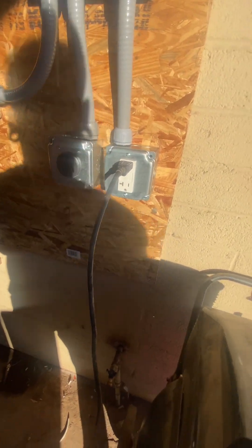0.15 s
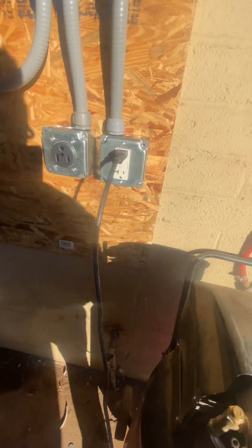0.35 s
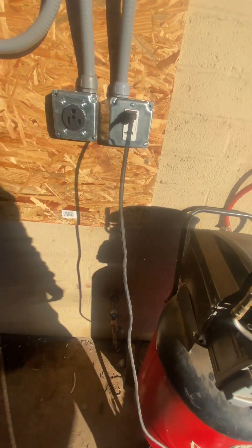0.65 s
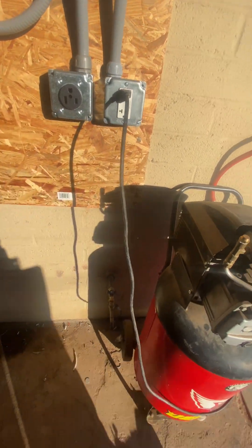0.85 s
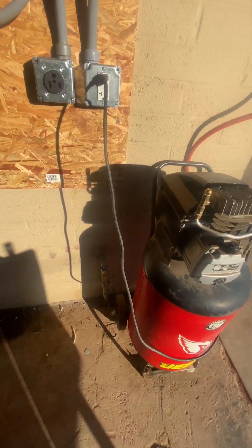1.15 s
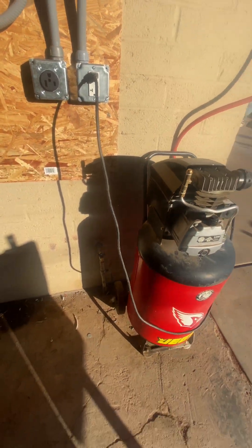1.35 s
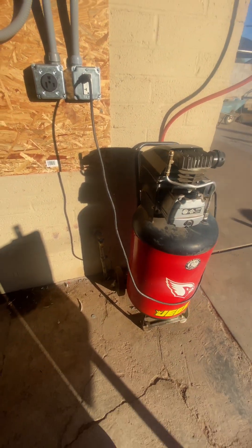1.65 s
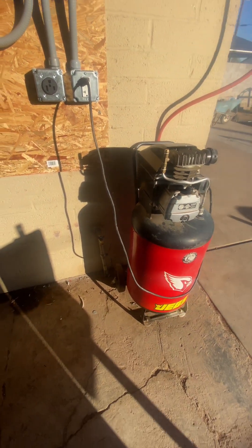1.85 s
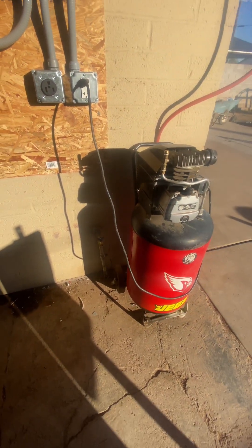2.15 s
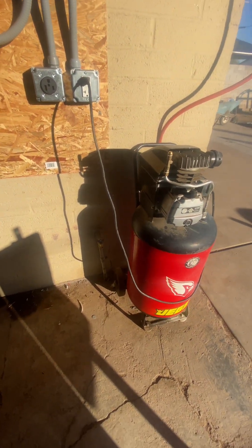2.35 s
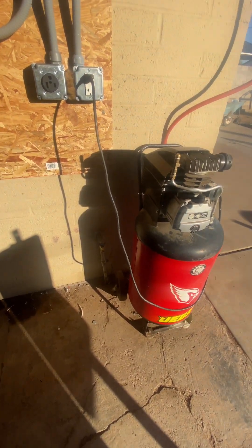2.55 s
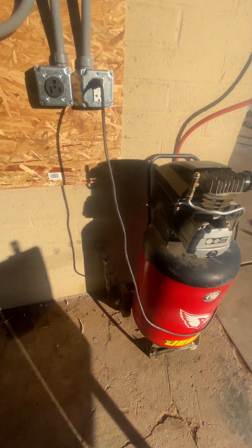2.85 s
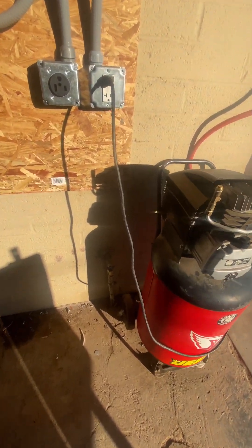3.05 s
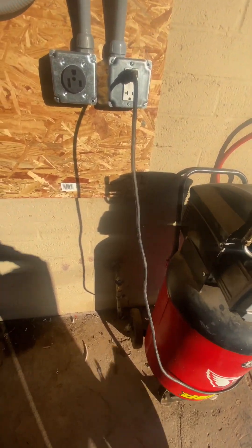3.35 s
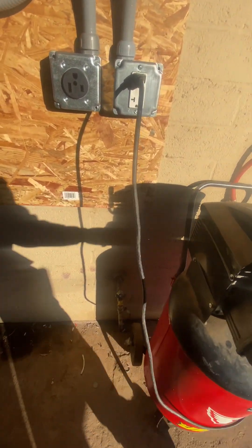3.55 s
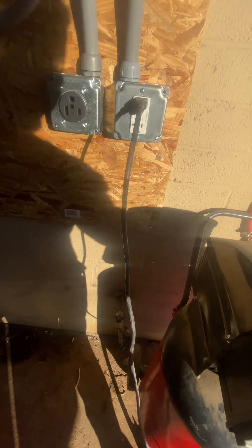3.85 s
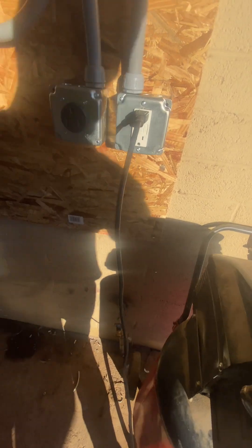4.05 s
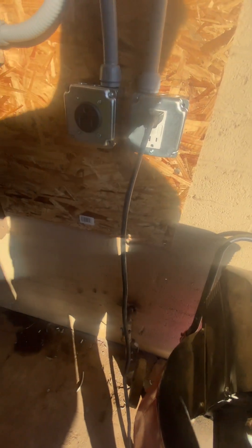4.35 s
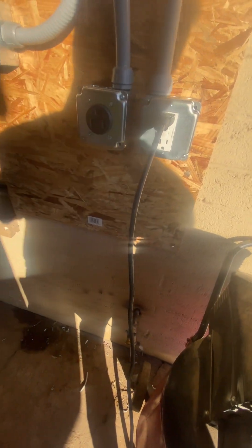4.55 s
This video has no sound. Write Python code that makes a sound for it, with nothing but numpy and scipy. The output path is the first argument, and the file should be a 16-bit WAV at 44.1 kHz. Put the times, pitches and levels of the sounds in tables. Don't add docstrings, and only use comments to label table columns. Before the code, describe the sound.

A small direct-drive air compressor is already running at full speed, close by, on concrete beside a wall. Its opening instant is slightly louder, then settles at once. The motor and pump make a rough, even low buzz, nearly sixty pulses per second, with low rushing intake air. Over it lies loud, bright metallic valve clatter, ringing and slightly unsteady, with tiny falling squeaks blended into the buzz. From about 0.2 to 2 seconds the microphone backs away; the clatter is strongest around 0.5, then drops by 1.2 and the hum thins. Faint dull footsteps fall around 0.7 to 0.8, 1.2, 1.6 to 1.9 and 2.2 to 2.6 seconds, mostly masked. From 2.5 the listener returns, passing the tank near 3.25 as the rattle brightens and strengthens, reaching the wall about 4.1. A last faint shuffle comes near 4.6; the machine still runs at the end, around 4.7.

```python
import sys
import numpy as np
from scipy import signal
from scipy.fft import rfft, irfft
from scipy.io import wavfile
from scipy.ndimage import uniform_filter1d, map_coordinates

SR = 44100
rng = np.random.default_rng(int(sys.argv[2]) if len(sys.argv) > 2 else 0)


def gain_from_db(level_db):
    decades = np.asarray(level_db, float) / 20
    return 10 ** decades


def generate_wav(signal):
    frames = np.transpose(np.atleast_2d(signal))
    scaled = np.clip(frames, -1, 1) * 32767
    pcm = np.round(scaled).astype(np.int16)
    wavfile.write(sys.argv[1], SR, pcm)


N = 207578

SHAFT_HZ = 56.87
STEPS = 1024
TURN_SR = SHAFT_HZ * STEPS
TURNS = int(N / SR * SHAFT_HZ) + 3
TOP_ORDER = 30
SOUND_M_S = 343
# time_s, place (0 by the wall, 1 stepped back, 2 passing the tank, 3 by the wall again)
WALK = [
    (0, 0),
    (.2, .1),
    (.8, .58),
    (1.4, .9),
    (2, 1),
    (2.5, 1.1),
    (3.25, 2),
    (4.1, 3),
    (4.71, 3),
]


def evened(x):
    return x / np.sqrt(np.mean(np.abs(x) ** 2) + 1e-20)


def levelled(x, turns):
    return x / np.sqrt(uniform_filter1d(x ** 2, int(turns * STEPS)) + 1e-20)


def curve(rows, t, axis=1):
    rows = np.asarray(rows)
    return np.interp(t, rows[:, 0], rows[:, axis])


def on_log(points, log_hz):
    hz, value = np.transpose(points)
    return np.interp(log_hz, np.log(hz + 1), value, left=value[0], right=value[-1])


def above(hz, steep):
    return lambda log_hz: 1 / (1 + np.exp(-steep * (log_hz - np.log(hz))))


def coloured(x, gain, rate):
    log_hz = np.log(np.fft.rfftfreq(len(x), 1 / rate) + 1)
    return irfft(rfft(x) * gain(log_hz), len(x))


def places(t):
    place = np.clip(curve(WALK, t), 0, 3)
    return np.clip(1 - np.abs(place - np.arange(4)[:, None]), 0, 1)


def drifting(width, memory_turns):
    window = np.exp(-.5 * (np.arange(-150, 151) / memory_turns) ** 2)
    noise = rng.standard_normal((TURNS + 300, width))
    return evened(signal.fftconvolve(noise, window[:, None], "valid", axes=0))


def feet(decay_s=0.0089):
    # start_s, level_db, pitch_hz
    footfalls = [
        (.70, -44, 130),
        (.78, -36, 140),
        (1.19, -46, 110),
        (1.61, -47, 80),
        (1.85, -43, 80),
        (2.22, -47, 120),
        (2.33, -39, 160),
        (2.57, -55, 90),
        (4.56, -48, 100),
    ]
    out, t = np.zeros(N), np.arange(3000) / SR
    envelope = t / decay_s * np.exp(1 - t / decay_s)
    for start_s, level_db, pitch_hz in footfalls:
        thud = gain_from_db(level_db) * envelope * np.sin(2 * np.pi * pitch_hz * t)
        out[round(start_s * SR):][:len(t)] += thud
    return out


def rush(t, near_db=-38.0, far_db=-41.5):
    # pitch_hz, density_db_per_hz
    air_colour = [(25, -30), (50, -2), (150, -5.5), (300, 0), (600, 1.5), (900, 0), (1500, -1), (2400, -15)]
    noise = evened(coloured(rng.standard_normal(N), lambda f: gain_from_db(on_log(air_colour, f)), SR))
    return gain_from_db(near_db + (far_db - near_db) * places(t)[1]) * noise


def upper_orders(first):
    first_db = np.array([-45.5, -54.5, -45.5, -46.5])
    fall_db_per_order = np.array([.3, -0.4, 0.73, 1.0])
    detour_m = np.array([3.105, 1.03, 1.1, 1.13])
    echo_share = np.array([0.5, 0.59, 1.0, .75])
    order = np.arange(first, TOP_ORDER + 1)[:, None]
    echo = np.clip(echo_share, 0, 1) * np.exp(-2j * np.pi * order * SHAFT_HZ * detour_m / SOUND_M_S)
    return gain_from_db(first_db - fall_db_per_order * (order - first)) * (1 + echo)


def throb(turn, t, scatter_turns=0.22, over_turns=0.37, wobble_db=0.38):
    # shaft_order, level_db at each of the four places
    intake_orders = [(1, -37.5, -48.5, -41.5, -41), (2, -38, -58, -46, -39), (3, -34, -40, -40, -37),
                     (4, -36.5, -36.5, -34.5, -37.5), (5, -44, -45, -42, -42), (6, -26.5, -37.5, -35, -28),
                     (7, -54, -45.5, -70, -45.5), (8, -39.5, -30.5, -37, -36.5),
                     (9, -36, -39.5, -35.5, -32.5), (10, -28, -41, -37.5, -36),
                     (11, -39, -51.5, -46, -36.5), (12, -28, -42.5, -35, -32), (13, -34, -40, -35, -32.5),
                     (14, -37.5, -41.5, -35, -34), (15, -28.5, -40.5, -36.5, -41),
                     (16, -36, -49, -34.5, -34), (17, -44, -55, -46, -35.5), (18, -48, -43.5, -36, -48),
                     (19, -45, -49.5, -48, -47), (20, -41, -48.5, -47, -39), (21, -43, -58, -44, -36.5),
                     (22, -38.5, -60, -41, -49), (23, -50, -50.5, -36.5, -39)]
    over_leaving = [7, 12, 13, 17, 20, 23]
    over_nearing = [7, 11, 12, 17, 19, 21]
    over_passing = [8, 10, 15]
    spread = np.array([.55, 1.5, 1.0, .7])
    rock_turn = .37
    table, coarse_s = np.array(intake_orders), t[::256]
    order, weight = np.arange(1, TOP_ORDER + 1), places(coarse_s)

    legs = ([], over_leaving, over_nearing, over_passing)
    turned = over_turns * np.cumsum([np.isin(order, leg) for leg in legs], axis=0).T
    levels = np.vstack([gain_from_db(table[:, 1:]), upper_orders(len(table) + 1)])
    strength = np.abs((levels * np.exp(2j * np.pi * turned)) @ weight)
    drift = drifting(len(order), 5.2).T
    wobble = np.array([np.interp(coarse_s * SHAFT_HZ, np.arange(len(w)), w) for w in drift])

    luck = spread * rng.standard_normal((len(order), len(weight))) @ weight
    growth = np.sqrt(np.maximum(order[:, None] - 4, 0) / 10)
    rocking = (order <= 2) * (.5 - rock_turn * order)
    phase_turns = -.1 + rocking[:, None] + scatter_turns * growth * luck
    heard = strength * gain_from_db(wobble_db * wobble) * np.exp(2j * np.pi * phase_turns)
    spin = np.exp(2j * np.pi * (turn - .965))
    out = np.zeros(len(t))
    for k, envelope in zip(order, heard):
        out += np.sqrt(2) * (np.interp(t, coarse_s, envelope) * spin ** int(k)).real
    return out


def squeak(uneven_db=1.5, slip_turns=.002):
    start_turn, length_s = .23, .0048
    from_hz, to_hz, fall_s = 11500, 3000, .0019
    slip = slip_turns * rng.standard_normal((TURNS, 1))
    age_s = ((np.arange(STEPS) / STEPS - start_turn) % 1 + slip) / SHAFT_HZ
    cycles = to_hz * age_s - (from_hz - to_hz) * fall_s * np.exp(-age_s / fall_s)
    envelope = np.sin(np.pi * np.clip(age_s / length_s, 0, 1))
    strength = gain_from_db(uneven_db * rng.standard_normal((TURNS, 1)))
    return evened(strength * envelope * np.sin(2 * np.pi * cycles)).ravel()


def valve_drive(memory_turns=15.5, floor_db=-7.5, click_db=19.0, uneven_db=2.0):
    blows = [
        (.1, -2, 0, 0.071),
        (.33, -10, 0, 0.094),
        (0.481, -4, -1, 0.14),
        (.62, 1, .5, 0.33),
        (0.778, -25, 2, 0.082),
    ]
    # pitch_hz, repeating_share of the clatter
    repeat_share = [(1200, .95), (2500, .88), (5000, .8), (8000, .62), (10500, .65), (13000, .45)]
    still_drift = .3
    angle = np.arange(STEPS) / STEPS
    power, clicks = gain_from_db(floor_db) ** 2, np.zeros((TURNS, STEPS))
    for at, hit_db, chatter_db, decay_turns in blows:
        power = power + gain_from_db(chatter_db) ** 2 * np.exp(-((angle - at) % 1) / decay_turns)
        hits_db = hit_db + click_db + uneven_db * rng.standard_normal(TURNS)
        clicks[:, int(at % 1 * STEPS)] = gain_from_db(hits_db)

    count = np.arange(TURNS)
    progress = np.clip(curve(WALK, count / SHAFT_HZ) / 3, 0, 1)
    walked = still_drift * count + (1 - still_drift) * (TURNS - 1) * progress
    repeated = np.sqrt(power) * drifting(STEPS, memory_turns)[walked.astype(int)] + clicks
    fresh = np.sqrt(power) * rng.standard_normal((TURNS, STEPS))

    def share(log_hz):
        return np.clip(on_log(repeat_share, log_hz), 0, 1)

    steady = coloured(evened(repeated).ravel(), lambda f: np.sqrt(share(f)), TURN_SR)
    return steady + coloured(evened(fresh).ravel(), lambda f: np.sqrt(1 - share(f)), TURN_SR)


def ring(x, hz, width_hz):
    r = np.exp(-np.pi * width_hz / TURN_SR)
    pole = [1, -r * np.exp(2j * np.pi * hz / TURN_SR)]
    return signal.lfilter([1], pole, signal.lfilter([1], pole, x)).real


def glint_db(hz, t):
    # centre_s, half_length_s, mode_hz, gain_db
    glints = [
        (.55, .25, 3640, 4),
        (.65, .28, 4605, 4),
        (.45, .08, 5800, -6),
        (.8, .15, 5800, 2),
        (1.22, .15, 5800, -12),
        (4.6, .15, 3640, -4),
        (4.2, .3, 10300, 3),
    ]
    total_db = 0
    for centre_s, half_s, mode_hz, gain_db in glints:
        if abs(mode_hz / hz - 1) < .03:
            total_db = total_db + gain_db * np.exp(-.5 * ((t - centre_s) / half_s) ** 2)
    return total_db


def clatter(turn, broad_db=-2.5, strike_db=29.5, uneven_db=2.0, sway_db=1.5):
    # time_s, level_db
    clatter_level = [(0.0, -19), (0.06, -19), (0.52, -18), (1.19, -22), (2.91, -22.5), (3.25, -20.5),
                     (4.67, -20), (4.71, -21.5)]
    # pitch_hz, density_db_per_hz
    near_colour = [(880, -35), (1500, -16), (1640, -13), (1810, -16), (3180, -12.5), (3680, -2.5),
                   (4140, -7), (4480, -3.5), (8870, -2.5), (10500, -1), (13900, -16), (15500, -48)]
    far_colour = [(880, -33), (1500, -24), (1900, -10.5), (2070, -17.5), (2750, -14.5), (3680, -6.5),
                  (4940, -8), (5770, -2.5), (6550, -5), (10600, -1), (14000, -27.5), (15500, -79)]
    # pitch_hz, width_hz, level_db at each of the four places, blow_turn
    head_modes = [(3660, 310, -12, -18.5, -10.5, -19, .29), (3904, 230, -19, -22, -14, -18.5, 0.43),
                  (4350, 740, -14, -20, -18, -18, 0.72), (4610, 48, -14.5, -17, -21, -13, 0.587),
                  (5060, 230, -11, -38, -40, -16, .33), (5570, 200, -38, -17, -21, -16, 0.66),
                  (5793, 480, -16, -11, -15, -21, .67), (7050, 120, -31, -31, -33, -25, .33),
                  (7450, 270, -15, -27, -37, -35, .62), (8340, 420, -14, -14.5, -9, -13, 0.34),
                  (9610, 190, -11, -18, -13, -16, 0.26), (10280, 140, -11.5, -8, -14, -6, .4),
                  (11780, 620, -15.5, -26, -26, -29, .4), (12050, 250, -21, -30, -32, -16.5, 0.93)]
    squeak_db = np.array([-14, -9.5, -13, -15])
    low_db, hiss_db, hush_db = [-13.5, -12.5, -12, -11.5], [-24, -30, -27, -24], [-4.5, -1.5, -2.5, -4.5]
    hush_turn, shake_turns = .12, .0006
    reed_hz, reed_db = 10300, 4.0

    drive = valve_drive()
    t = (np.arange(len(drive)) / STEPS - 1) / SHAFT_HZ
    weight = places(t)
    near = evened(coloured(drive, lambda f: gain_from_db(on_log(near_colour, f)), TURN_SR))
    far = evened(coloured(drive, lambda f: gain_from_db(on_log(far_colour, f)), TURN_SR))
    broad = (1 - weight[1]) * near + weight[1] * far
    upper = coloured(broad, above(2950, 9.2), TURN_SR)
    top = coloured(broad, above(14200, 60), TURN_SR)
    low = coloured(broad - upper, above(1704, 28), TURN_SR)
    hiss = coloured(drive, lambda f: above(14200, 60)(f) * gain_from_db(-90.0 * (f - np.log(14200))), TURN_SR)
    sound = gain_from_db(broad_db) * evened(upper - top)
    sound += gain_from_db(low_db @ weight) * levelled(low, 50.0)
    sound += gain_from_db(hiss_db @ weight) * levelled(hiss, 8.5)

    sway = sway_db * drifting(len(head_modes), 8.0)[:TURNS].repeat(STEPS, axis=0).T
    for k, (hz, width_hz, *place_db, at) in enumerate(head_modes):
        own = np.roll(drive, k * STEPS).reshape(TURNS, STEPS)
        harder_db = reed_db * (abs(reed_hz / hz - 1) < .03)
        blow_db = strike_db + harder_db + uneven_db * rng.standard_normal(TURNS)
        own[:, int(at % 1 * STEPS)] += gain_from_db(blow_db)
        gain = gain_from_db(np.array(place_db)) @ weight * gain_from_db(sway[k] + glint_db(hz, t))
        sound += gain * levelled(ring(own.ravel(), hz, width_hz), 23.5)

    sound += gain_from_db(squeak_db @ weight) * squeak()
    angle = np.arange(len(t)) / STEPS
    intake = (.5 + .5 * np.cos(2 * np.pi * (angle - hush_turn))) ** 2
    sound *= gain_from_db(hush_db @ weight * (intake - 0.34))
    jitter = shake_turns * np.interp(turn, np.arange(TURNS), rng.standard_normal(TURNS))
    return map_coordinates(sound * gain_from_db(curve(clatter_level, t)), [(turn + jitter + 1) * STEPS], order=3)


def scene():
    lead_turns, creep_hz = .013, .012
    t = np.arange(N) / SR
    farther_m = uniform_filter1d(np.array([0, .53, .37, .07]) @ places(t), size=8000)
    turn = (SHAFT_HZ + creep_hz) * t + lead_turns - SHAFT_HZ * farther_m / SOUND_M_S
    return (feet() + rush(t) + throb(turn, t) + clatter(turn))[None]


def roll_off(x):
    return signal.sosfilt(signal.butter(12, 15630, fs=SR, output="sos"), x)


def record(dry):
    settle = gain_from_db(5.7 * np.exp(-np.arange(N) / SR / 0.016))
    limited = .9 * np.tanh(coloured(dry[0] * settle, above(38, 6), SR) / .9)
    return roll_off(limited[None])


dry = scene()
out = record(dry)
generate_wav(out)
```